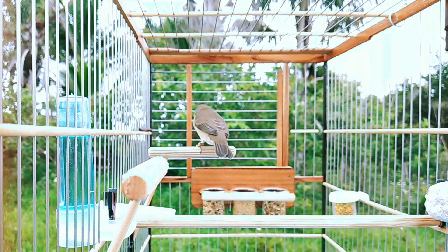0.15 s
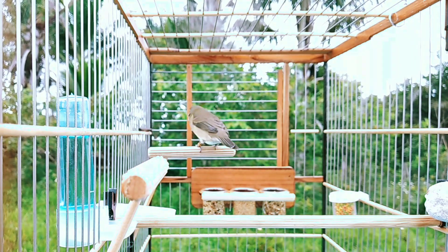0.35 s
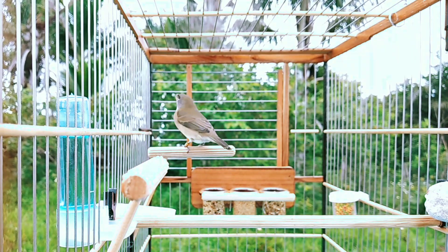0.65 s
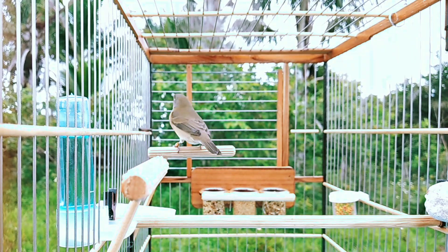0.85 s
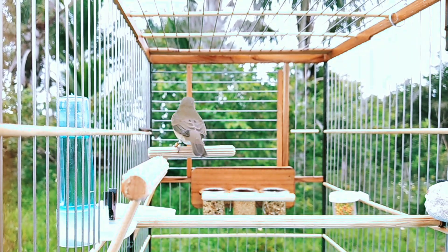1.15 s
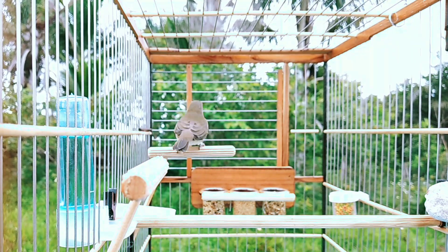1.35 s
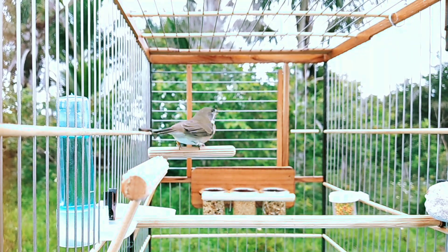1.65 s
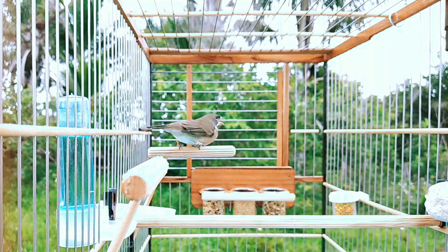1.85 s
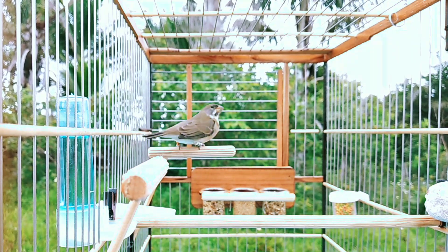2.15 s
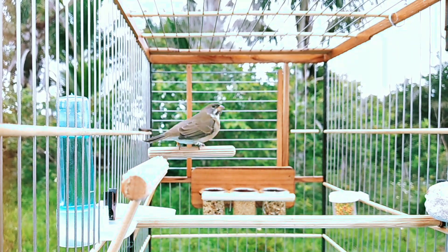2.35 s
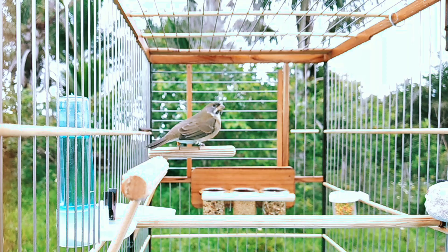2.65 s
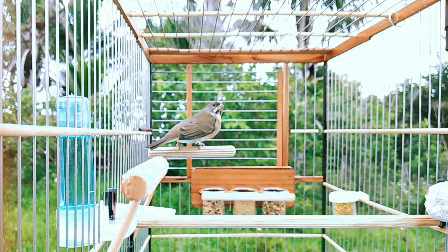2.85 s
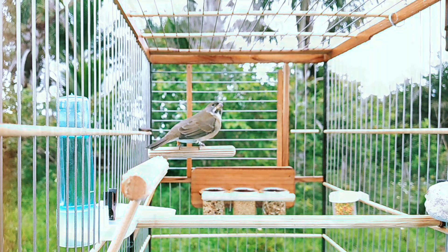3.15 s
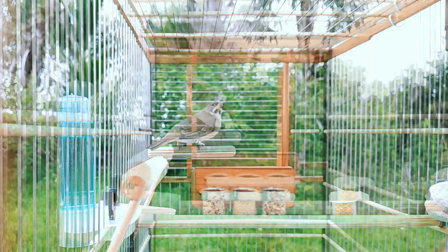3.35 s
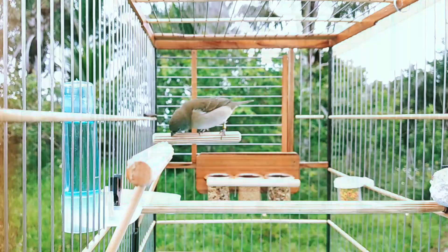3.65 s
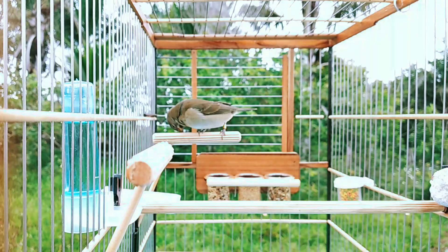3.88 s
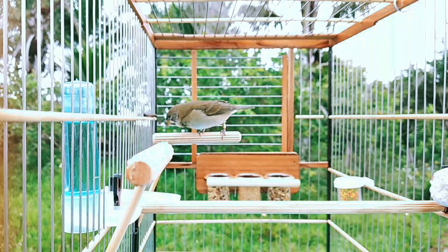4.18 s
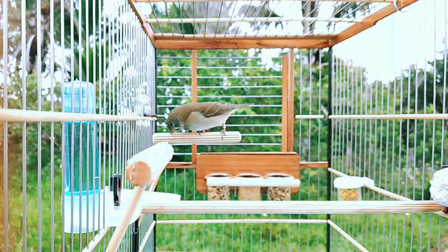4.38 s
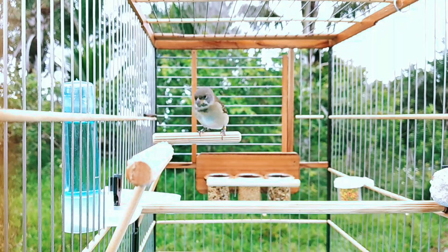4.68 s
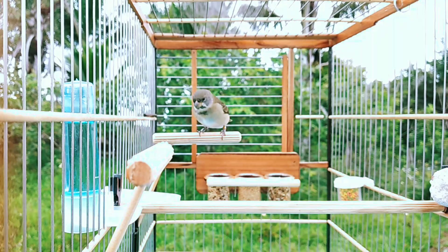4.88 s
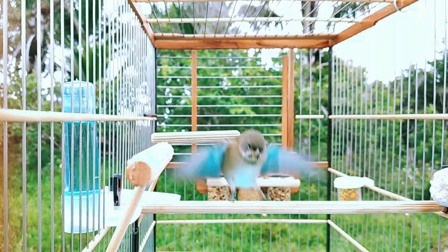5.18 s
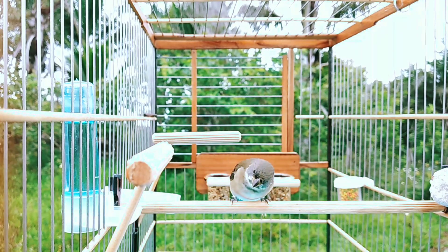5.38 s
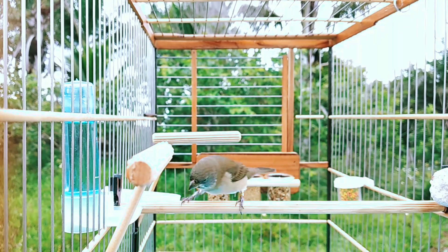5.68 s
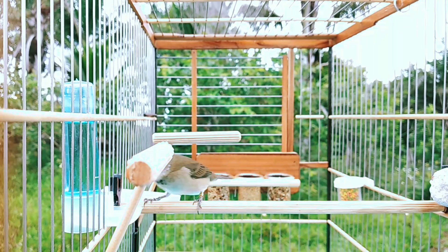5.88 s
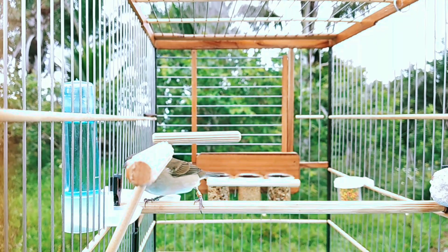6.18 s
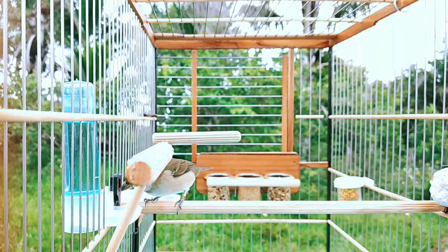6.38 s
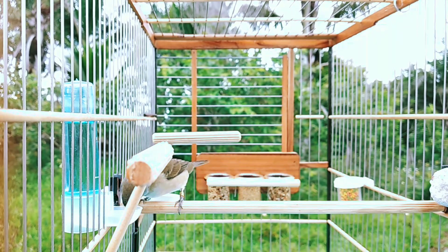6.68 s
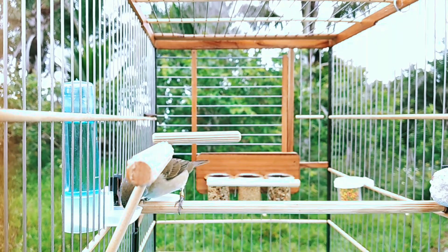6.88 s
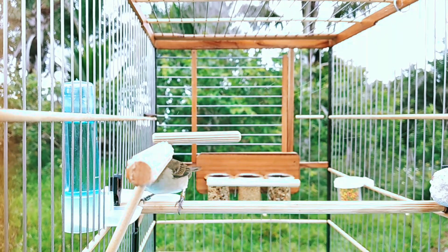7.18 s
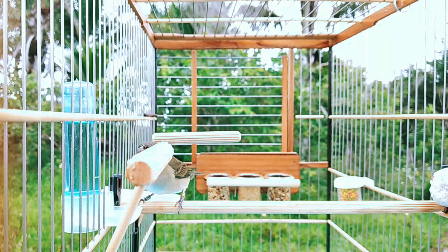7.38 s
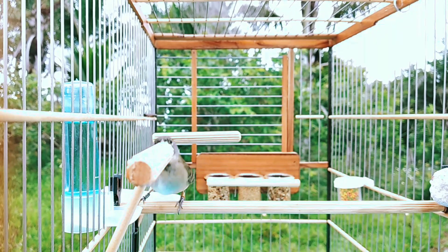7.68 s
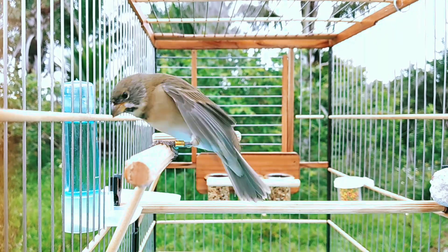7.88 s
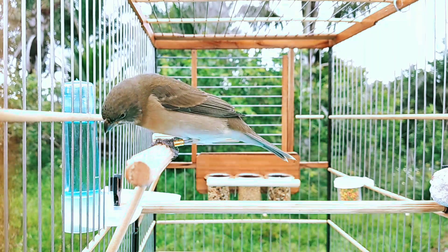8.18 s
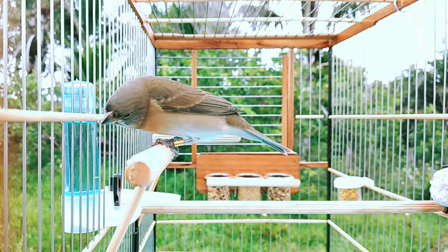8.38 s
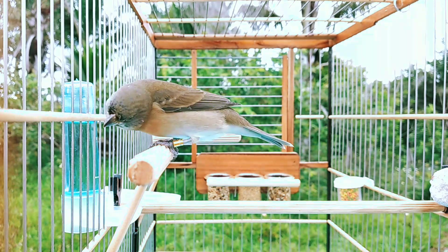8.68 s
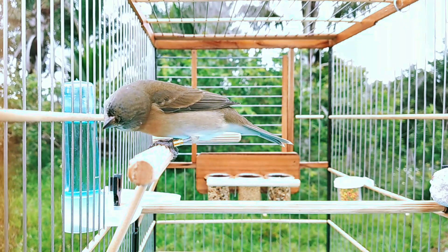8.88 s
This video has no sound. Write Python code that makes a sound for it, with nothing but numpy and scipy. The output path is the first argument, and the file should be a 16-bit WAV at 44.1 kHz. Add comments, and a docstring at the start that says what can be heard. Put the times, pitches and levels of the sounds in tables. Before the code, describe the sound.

Outdoors, a finch sings a brief burst of high rising then falling whistles, followed by soft perch scuffs and a wing flutter amid droning insects.

```python
"""A small caged finch close by in a garden sings five rising notes, then two falling ones.
The two sides of its syrinx, shaken near sines with overtones and hiss, overlap and beat.
Then it scuffs about in grainy noise bursts amid thin gliding chirps, knocks twice on a perch and flutters.
Throughout, insects drone on the left as pulsing bands of noise, under a fine hiss of leaves.
The recorder's noise gate chops the low rumble of the open air into soft sputters."""
import sys
import numpy as np
from scipy import signal
from scipy.fft import rfft, irfft, next_fast_len
from scipy.io import wavfile
from scipy.ndimage import uniform_filter1d, map_coordinates

SR = 44100
rng = np.random.default_rng(int(sys.argv[2]) if len(sys.argv) > 2 else 0)


def transcribe(u):
    """Save the signal u as a 16-bit wav file named by the first command-line argument.

    u: samples, shape (n,) or (channels, n), limited to [-1, 1]; the rate is SR.
    q: integer samples, one column per channel.
    """
    v = np.clip(np.atleast_2d(u).T, -1, 1)
    q = np.round(v * 32767).astype(np.int16)
    wavfile.write(sys.argv[1], SR, q)


N = 398649
T = np.arange(N) / SR

# Colour of moving air. Each row: frequency in Hz, relative level in dB per Hz.
RUMBLE = [(8,3),(25,-0.5),(50,-4),(100,-8.5),(200,-17.5),(500,-16.5),(1200,-25.5),(2200,-27.5),(3200,-50)]
# every stroke swells from and dies to FADE_DB under its level
FADE_DB, ATTACK_S, RELEASE_S = 18.5, .007, .008
CLEAR_HZ = 3530  # where the run-up clears and the held tone bends to


def song():
    """Where the two sides of the syrinx sound together they beat, a few hundred times a second."""
    # Hiss of a hoarse note, before its dull or bright tilt. Each row: frequency in Hz, relative dB per Hz.
    rasp_colour = [(900,-5.5),(1600,4),(3500,-7.5),(5500,9.5),(7600,-4),(8800,-5),(15500,-17.5)]
    # Rising notes. Each row: start, voice clears, whistle joins, whistle alone, end, all in seconds,
    # glide, whistle and held tone in dB before their swells, whistle's first and last pitch in Hz
    # before its arch and droop, whistle's added rasp (0-1).
    rising_notes = [(0.493,0.544,.584,.603,.644,-39.5,-32,-58.5,4010,4170,0.02),
                    (0.809,0.861,.902,.921,.963,-35,-26,-54.5,3975,4090,0.02),
                    (1.031,1.099,1.126,1.159,1.206,-31,-25,-48,3980,4050,0.11),
                    (1.255,1.335,1.368,1.395,1.435,-31.5,-23.5,-44,3944,4112,0.03),
                    (1.481,1.559,1.595,1.627,1.660,-30,-24,-44,3950,4130,.04)]
    # Falling notes. Each row: start, pitch breaks, tail joins, tail alone, end, all in seconds,
    # tail's starting level in dB before its edges, pitch it settles towards in Hz.
    falling_notes = [(1.71,1.749,1.795,1.836,1.877,-30.5,3814),(1.927,1.969,2.008,2.054,2.104,-31.5,3644)]
    # Effort of each sweep, one list a note. Each row: time in seconds, level in dB before gain and edges.
    sweep_effort = [
        [(1.711, -41), (1.719, -33), (1.729, -49.5), (1.753, -30.5), (1.767, -34), (1.775, -43.5), (1.791, -32),
         (1.825, -36.5), (1.832, -29.5)],
        [(1.931, -49), (1.947, -52), (1.953, -37.5), (1.991, -36), (1.999, -36.5), (2.045, -30), (2.051, -31)],
    ]

    hiss = noise(rasp_colour, likeness=0)
    dull = shape(hiss, lambda f: gain_at(f, [(7000, -1.5), (10000, -5.5)]))
    bright = shape(hiss, lambda f: gain_at(f, [(2500, -8.5), (4500, 3.5), (8000, 1), (11000, -1)]))
    held, run_ups, whistles, sweeps, tails = [], [], [], [], []
    for start, clear, join, alone, end, glide_db, whistle_db, held_db, first_hz, last_hz, rasp in rising_notes:
        held.append(held_tone(start, clear, held_db))
        run_ups.append(run_up(start, clear, alone, glide_db))
        whistles.append(whistle(join, alone, end, whistle_db, first_hz, last_hz, rasp))
    for (start, breaks, join, alone, end, tail_db, tail_hz), effort in zip(falling_notes, sweep_effort):
        stroke = sweep(start, breaks, alone, effort)
        sweeps += [stroke, strand(stroke, breaks)]
        tails.append(tail(join, end, tail_db, tail_hz))

    rising = syrinx(held, dull, overtone_db=-17, blur=.6, jitter=0.056, shimmer=0.717, hiss_db=-4.5,
                    flutter_hz=600, buzz=0.596, buzz_hz=736.5, least_rasp=0.289)
    rising += syrinx(run_ups, dull, overtone_db=0, blur=.5, jitter=0.14, shimmer=0.7, hiss_db=-12.0,
                     flutter_hz=605.3, buzz=0.54, buzz_hz=593.5, least_rasp=.015)
    rising += syrinx(whistles, bright, overtone_db=1, blur=.5, jitter=.14, shimmer=1.6, hiss_db=-11,
                     flutter_hz=400, buzz=.6, buzz_hz=700, least_rasp=.03)
    falling = syrinx(sweeps, bright, overtone_db=11, blur=0.92, jitter=0.1, shimmer=0.55, hiss_db=-13,
                     flutter_hz=594.5, buzz=0.24, buzz_hz=1155, least_rasp=0.049)
    falling += syrinx(tails, bright, overtone_db=7.5, blur=0.67, jitter=0.098, shimmer=1.0, hiss_db=-12.5,
                      flutter_hz=902, buzz=0.16, buzz_hz=890, least_rasp=0.13)
    return rising + falling


def syrinx(strokes, hiss, overtone_db, blur, jitter, shimmer, hiss_db, flutter_hz, buzz, buzz_hz,
           least_rasp, right_turn=1.56):
    """One side of the syrinx: a near sine; rasp shakes it, adds sidebands and brings hiss."""
    # Overtones that pass throat and bill. Each row: frequency in Hz, dB that overtone_db is added to.
    throat = [(3000,-5),(5800,-15.5),(7400,-19.5),(8500,-41),(11000,-36.5),(12500,-41.5),(15500,-46.5)]
    # Cage reflections make the balance depend on pitch. Each row: frequency in Hz, right minus left in dB.
    balance = [(1500,-2.5),(3000,-2.5),(3470,6),(3700,-2),(3900,-7.5),(4150,-15),(4400,-5.5),(4750,-4),(5200,-3.5),(5900,-6),(6400,-13),(7200,4)]
    out = np.zeros((2, N))
    for t, hz, db, hoarse in strokes:
        i = np.rint(t * SR).astype(int)
        right_db = np.interp(hz, *np.transpose(balance))
        rasp = np.clip(least_rasp + hoarse, 0, 1)
        # the membranes also flap slowly, which puts strands on both sides of the tone
        flap_hz = buzz_hz * (1 + 0.3 * wander(t, 160))
        flap = buzz * rasp * np.sin(2 * np.pi * np.cumsum(flap_hz) / SR)
        shaken_hz = hz * (1 + jitter * rasp * wander(t, flutter_hz))
        phase = 2 * np.pi * np.cumsum(shaken_hz) / SR + flap
        # the tone reaches the right side by a longer path, turned in phase (radians)
        tone = np.array([np.sin(phase), undb(right_db) * np.sin(phase - right_turn)])
        tone = tone * (1 + flap / 2)
        # overtones scatter round the cage and arrive blurred
        blurred = np.array([phase + blur * wander(t, 400) for _ in range(2)])
        overtones = 0
        for k in range(2, 5):
            overtones = overtones + gain_at(k * hz, throat) * (k * hz < SR / 2) * np.sin(k * blurred)
        scattered = undb(overtone_db) * overtones + undb(hiss_db) * rasp * hiss[:, i]
        scattered = scattered * undb(right_db / 2)
        scattered *= undb([[-2], [2]])  # they favour the right
        fade = np.clip(np.minimum(t - t[0], t[-1] - t) / .002, 0, 1)
        # the tone's level is shared between left and right
        strength = undb(db) / np.hypot(1, undb(right_db))
        strength = strength * np.exp(shimmer * rasp * wander(t, flutter_hz / 2))
        out[:, i] += np.sqrt(2) * fade * strength * (tone + scattered)
    return out


def run_up(start, clear, alone, db):
    """Lower side: pitch climbs ever faster out of a hoarse murmur, clears, jumps in level and glides up."""
    hoarse_hz, glide_top_hz, climb_power = 1450, 4000, 1.75
    hoarse_db, run_up_swell_db, glide_swell_db = -55.5, 9, 1.5
    hoarse_rasp, clear_rasp = .7, .035
    t = span(start, alone + RELEASE_S / 2)
    climb, glide = ramp(t, start, clear), ramp(t, clear, alone)
    cleared = ramp(t, clear - .006, clear + .0097)
    hz = hoarse_hz + (CLEAR_HZ - hoarse_hz) * climb ** climb_power
    hz += (glide_top_hz - CLEAR_HZ) * glide ** 1.6
    murmur_db = hoarse_db + run_up_swell_db * climb ** 3
    level = (1 - cleared) * murmur_db + cleared * db + glide_swell_db * glide ** 2
    rasp = hoarse_rasp + (clear_rasp - hoarse_rasp) * cleared
    return t, hz, level + edges(t, ATTACK_S, RELEASE_S), rasp


def held_tone(start, clear, db):
    """A soft tone over the run-up creeps higher and at last bends up into the glide."""
    held_hz, rise_hz_per_s, bend_s = 2900, 1300, 0.00976
    lead_s, arch_db = .004, 13
    t = span(start + lead_s, clear)
    hz = held_hz + rise_hz_per_s * (t - start)
    hz += (CLEAR_HZ - hz) * np.exp((t - clear) / bend_s)
    return t, hz, db - arch_db * np.linspace(-1, .6, len(t)) ** 2, 0


def whistle(join, alone, end, db, first_hz, last_hz, rasp):
    """An arch of pitch that swells to full strength as the lower side stops, and droops as it dies."""
    arch_hz, droop_hz, subdued_db, whistle_release_s = 119.9, 160.3, -8.5, 0.018
    t = span(join, end)
    u = ramp(t, join, end)
    hz = first_hz + (last_hz - first_hz) * u + arch_hz * np.sin(np.pi * u)
    hz -= droop_hz * ramp(t, end - RELEASE_S, end)
    subdued = 1 - ramp(t, join, alone + RELEASE_S / 2) ** 3
    return t, hz, db + subdued_db * subdued + edges(t, ATTACK_S / 2, whistle_release_s), rasp


def sweep(start, breaks, alone, effort):
    """Upper side: a high tone sags, breaks harshly, slides down and droops into the tail."""
    top_hz, end_hz, sag_hz_per_s, drop_s = 6840, 4630, 8130, .022
    droop_hz, droop_s, gain_db = 450, 0.0043, 4
    sweep_rasp, break_rasp, break_s = 0.19, 0.35, 0.032
    t = span(start, alone)
    hz = end_hz + (top_hz - end_hz) * np.exp(-np.maximum(t - breaks, 0) / drop_s)
    hz += sag_hz_per_s * np.maximum(breaks - t, 0)  # begins above the top and sags to it
    hz -= droop_hz * np.exp((t - alone) / droop_s)
    level = np.interp(t, *np.transpose(effort)) + gain_db + edges(t, ATTACK_S, RELEASE_S / 2)
    # harshest just after the break
    rasp = sweep_rasp + break_rasp * np.exp(-((t - breaks - break_s / 2) / break_s) ** 2)
    return t, hz, level, rasp


def strand(stroke, breaks):
    """A second strand peels off a sweep at its break and dives faster."""
    strand_db, dive_hz_per_s, strand_s = -10.5, 46000, 0.034
    inside = (stroke[0] > breaks) & (stroke[0] < breaks + strand_s)
    t, hz, db, rasp = (column[inside] for column in stroke)
    level = db + strand_db + edges(t, ATTACK_S / 2, RELEASE_S)
    return t, hz - dive_hz_per_s * (t - breaks), level, rasp / 2


def tail(join, end, db, rest_hz):
    """Lower side: a reedy tone slips in under the sweep, settles, and falls away at the end."""
    above_hz, settle_s, drop_hz, drop_s = 1300, .018, 930, 0.0065
    tail_release_s, fade_db_per_s = .016, 28
    t = span(join, end)
    hz = rest_hz + above_hz * np.exp((join - t) / settle_s) - drop_hz * np.exp((t - end) / drop_s)
    level = db - fade_db_per_s * (t - join) + edges(t, 2 * ATTACK_S, tail_release_s)
    return t, hz, level, 0


def edges(t, attack, release):
    """Rounded attack and release of a stroke, in dB."""
    rise, fall = ramp(t, t[0], t[0] + attack), ramp(t, t[-1] - release, t[-1])
    return -FADE_DB * ((1 - rise) ** 2 + fall ** 2)


def garden(x, near_db=-26, near_t60=.045, far_db=-35, far_t60=0.73):
    """Quick reflections from the cage and a faint tail from the trees, as decaying noise echoes."""
    t = T[:SR // 2]

    def echoes(t60):
        """Random echoes that fall 60 dB in t60 seconds."""
        h = rng.standard_normal((2, len(t))) * np.exp(-np.log(1000) * t / t60) * (t > .002)
        return unit(h) / np.sqrt(len(t))

    response = undb(near_db) * echoes(near_t60) + undb(far_db) * echoes(far_t60)
    return x + signal.fftconvolve(x, response, axes=1)[:, :N]


def scuffs(grain_db=-0.5, low_db=-6, perch_hz=250, perch_decay=0.022):
    """Dull, grainy bursts whose lows come later and stay longer, and soft knocks on the perch."""
    # Colour of the bursts. Each row: frequency in Hz, relative level in dB per Hz.
    scuff_colour = [(40,5),(120,-1),(300,6),(800,1),(1600,-2.5),(2500,-9),(4000,-29.5),(6000,-16.5),(10000,-32.5),(15000,-66)]
    # Feet on the wooden perch. Each row: time in seconds, level in dB.
    perch_knocks = [(5.556,-57.5),(6.186,-56.5)]
    grain = undb(grain_db * wander(T, 180))
    out = bursts(rise=0.011, linger=0.92) * grain * noise(scuff_colour, likeness=0.091)
    out += undb(low_db) * bursts(rise=0.026, linger=1.56) * noise(RUMBLE, likeness=0.58)
    for s, db in perch_knocks:
        age = np.maximum(T - s, 0)
        out += undb(db) * np.exp(-age / perch_decay) * np.sin(2 * np.pi * perch_hz * age)
    return out


def bursts(rise, linger):
    """Level of the bursts over time: a linear rise in seconds, then a decay that linger stretches."""
    # Scuffs, thuds and wing rustle of the bird, and faint puffs of low air let through by the gate.
    # Each row: start in seconds, level in dB, decay in seconds before linger stretches it.
    burst_times = [(2.243,-60,0.033),(2.90,-57.5,0.016),(3.582,-56.5,0.071),(3.717,-60.5,0.12),(3.839,-56.5,0.034),(3.899,-57.5,0.036),(4.162,-57,0.081),(4.253,-54,0.049),(4.462,-62.5,0.016),(4.88,-62.5,0.019),
                   (5.053,-55.5,0.13),(5.097,-51.5,0.043),(5.126,-53,0.066),(5.769,-60.5,0.045),(7.66,-65.5,0.062),(7.754,-68,0.04),(7.81,-62.5,0.095)]
    power = np.zeros(N)
    for s, db, decay in burst_times:
        age = np.maximum(T - s, 0)
        dying = np.exp(-np.maximum(age - rise, 0) / (decay * linger))
        power += (undb(db) * np.minimum(age / rise, 1) * dying) ** 2
    return np.sqrt(power)


def wingbeats(beat_hz=25.9, eddy_db=-12, count=3):
    """Close to the microphone, each wing stroke pushes and pulls the air and sheds eddies."""
    # Wings close by. Each row: start in seconds, level in dB.
    flutter_times = [(7.753,-42.5)]
    out = 0
    for s, db in flutter_times:
        turns = np.clip((T - s) * beat_hz, 0, count)
        strength = np.sqrt(np.abs(np.sin(np.pi * turns / count)))
        eddies = undb(eddy_db) * noise(RUMBLE, likeness=0.28)
        out += undb(db) * strength * (np.sin(2 * np.pi * turns) + eddies)
    return out


def chirps(right_db=-2, octave_db=-22, octave_top_hz=11500):
    """Short thin glides that swell and fade, with a faint octave."""
    # Each row: start in seconds, length in seconds, start, middle and end pitch in Hz, level in dB.
    chirp_calls = [(2.472,0.035,6400,6250,6000,-65),(3.598,0.11,8150,8130,8060,-72.5),(4.947,0.02,5850,5630,5430,-57.5),
                   (6.24,0.29,5350,5590,6370,-77),(6.352,0.02,6200,5900,5400,-52),(6.382,0.0048,7200,7560,7750,-46.5),
                   (6.356,0.11,8100,9360,8550,-81.5),(6.401,.04,5870,6080,6350,-65),(6.952,0.1,2750,3970,5380,-81.5),(7.227,0.075,3400,4250,5300,-79.5),(7.262,0.069,3730,3920,4880,-79),(7.309,0.15,3220,2670,2640,-80),
                   (7.782,0.16,4200,3630,3530,-81.5),(7.794,0.098,5100,4500,4200,-76),(8.124,0.01,2080,1626,1500,-57.5),(8.637,0.034,6400,5780,5450,-62.5)]
    out = np.zeros(N)
    for s, length, start_hz, middle_hz, end_hz, db in chirp_calls:
        i = np.arange(int(s * SR), min(int((s + length) * SR), N))
        u = np.linspace(0, 1, len(i))
        curve = np.polyfit([0, .5, 1], [start_hz, middle_hz, end_hz], 2)
        hz = np.polyval(curve, u) * (1 + .012 * wander(i / SR, 600))
        phase = 2 * np.pi * np.cumsum(hz) / SR
        octave = undb(octave_db) * (2 * hz < octave_top_hz) * np.sin(2 * phase)
        out[i] += np.sqrt(2) * undb(db) * np.sin(np.pi * u) * (np.sin(phase) + octave)
    return place(out, right_db)


def insects(shrill_hz=7670, shrill_width_hz=65, shrill_db=-67, swell_hz=1.914, swell_s=5.42, swell_db=4):
    """Steady pulsing choruses, and a shriller one that swells about twice a second."""
    # Each row: centre in Hz, width in Hz, level in dB relative to the other choruses,
    # right minus left in dB, pulses per second, pulse depth in dB either way.
    insect_kinds = [(5607,90,-97.5,-8.5,31,1),(6330,160,-71.5,-12.5,26.2,1),(6615,165,-63.5,-16,84,2.5),(7220,190,-61.5,-12.5,55,1),(7475,125,-58,-16.5,47,3),(7854,91,-77.5,-5,43,5)]
    # Level of the whole drone before a 1 dB lift. Each row: time in seconds, level in dB.
    drone_level = [(0,-58.5),(2.2,-60),(2.4,-59),(2.95,-57.5),(3.1,-62),(6,-61),(9,-60.5)]
    swell = swell_db * np.cos(2 * np.pi * swell_hz * (T - swell_s))
    out = place(undb(shrill_db + swell), -10) * chorus(shrill_hz, shrill_width_hz)
    for hz, width_hz, db, right_db, pulse_rate, depth_db in insect_kinds:
        uneven_rate = pulse_rate * (1 + .05 * wander(T, 6.7))
        pulse = np.sin(2 * np.pi * np.cumsum(uneven_rate) / SR)
        level = undb(db + depth_db * pulse + .8 * wander(T, 19))
        out += place(level, right_db) * chorus(hz, width_hz)
    return unit(out) * undb(np.interp(T, *np.transpose(drone_level)) + 1.0)


def chorus(hz, width_hz):
    """Many unrelated insects of one kind merge into a narrow band."""
    return unit(shape(rng.standard_normal((2, N)), lambda f: np.exp(-.5 * ((f - hz) / width_hz) ** 2)))


def open_air(hiss_db=-72.5374, gap_db=-10, gust_db=2.0, gust_rate=16):
    """Low, uneven rumble of moving air, lowered in the gate gaps, and a fine hiss of leaves."""
    # Strength of the breeze before gate gaps and gusts. Each row: time in seconds, level in dB.
    breeze = [(0,-62),(.8,-61.5),(1.2,-62.5),(1.9,-61.5),(2.3,-63),(2.8,-62.5),(3.2,-64.5),(4.0,-63),(4.7,-65),(5.3,-59),(5.7,-62.5),(6.6,-64),(7.4,-65),(7.8,-60.5),(8.2,-62.5),(9.0,-62.5)]
    # The noise gate stays shut on the rumble. Each row: from and to, in seconds.
    gate_gaps = [(.13,.21),(1.19,1.26),(2.08,2.23),(2.51,2.58),(2.79,2.88),(4.91,5.0),(5.48,5.55),(6.93,7.05),(7.18,7.32),(8.17,8.28),(8.9,9.0)]
    # Colour of the leaves. Each row: frequency in Hz, relative level in dB per Hz.
    leaf_colour = [(1500,2.5),(2800,-10.5),(4000,-1.5),(5300,4.5),(7500,10.5),(8800,-18),(11500,-16),(12500,-24),(15500,-21)]
    shut = uniform_filter1d(sum(1. * ((T > a) & (T < b)) for a, b in gate_gaps), SR // 50)
    breeze_db = np.interp(T, *np.transpose(breeze)) + gap_db * shut + gust_db * wander(T, gust_rate)
    rumble = undb(breeze_db) * noise(RUMBLE, likeness=0.46)
    leaves = place(undb(hiss_db), -3.0)[:, None] * noise(leaf_colour, likeness=0.042)
    return rumble + leaves


def undb(db):
    """Decibels to gain."""
    return 10 ** (np.asarray(db) / 20)


def unit(x):
    """Scale to rms 1."""
    return x / np.sqrt(np.mean(x ** 2))


def gain_at(hz, points):
    """Read a (Hz, dB) spectrum on a log-frequency axis."""
    f, db = np.transpose(points)
    return undb(np.interp(np.log(np.maximum(hz, 1)), np.log(f), db))


def shape(x, response):
    """Filter by a gain that is a function of frequency."""
    size = next_fast_len(N + 4096)
    hz = np.arange(size // 2 + 1) * SR / size
    return irfft(rfft(x, size) * response(hz), size)[..., :N]


def noise(points, likeness):
    """Stereo noise of a given colour at rms 1; likeness is the correlation of left and right."""
    mid, side = shape(rng.standard_normal((2, N)), lambda f: gain_at(f, points))
    c = np.clip(likeness, -1, 1)
    return unit(np.sqrt(1 + c) * mid + np.sqrt(1 - c) * side * np.array([[1], [-1]]))


def wander(t, rate):
    """Smooth chance with a spread near 1 that changes rate times a second."""
    steps = (t - t[0]) * rate
    return map_coordinates(rng.standard_normal(int(steps[-1]) + 2), [steps], order=2, mode="nearest")


def place(x, right_db):
    """Left as it is, right louder or softer."""
    return np.array([x, x * undb(right_db)])


def span(start, end):
    """Sample times between two moments."""
    return T[int(start * SR):int(end * SR)]


def ramp(t, start, end):
    """Rises from 0 to 1 between two moments."""
    return np.clip((t - start) / (end - start), 0, 1)


def scene():
    """The bird in its cage amid the garden; the thin chirps carry more echo."""
    birds = garden(song()) + garden(chirps(), near_db=-1, far_db=-6.5, far_t60=0.4)
    return birds + scuffs() + wingbeats() + insects() + open_air()


def record(dry, split_hz=2800, threshold_db=-60, closed_db=-16.0, steepness=4, window_s=.003, top_hz=15750):
    """A fast noise gate lets the lower band through in full only at its peaks; the top is cut."""
    low = shape(dry, lambda f: 1 / (1 + (f / split_hz) ** 12))
    power = uniform_filter1d(np.mean(low, axis=0) ** 2, max(int(window_s * SR), 1))
    loudness = np.sqrt(np.abs(power)) / undb(threshold_db)
    opening = np.clip(loudness ** steepness, undb(closed_db), 1)
    gated = dry - low + opening * low
    top_cut = signal.ellip(10, .2, 70, top_hz, fs=SR, output="sos")
    return signal.sosfilt(top_cut, gated)


dry = scene()
out = record(dry)
transcribe(out)
```